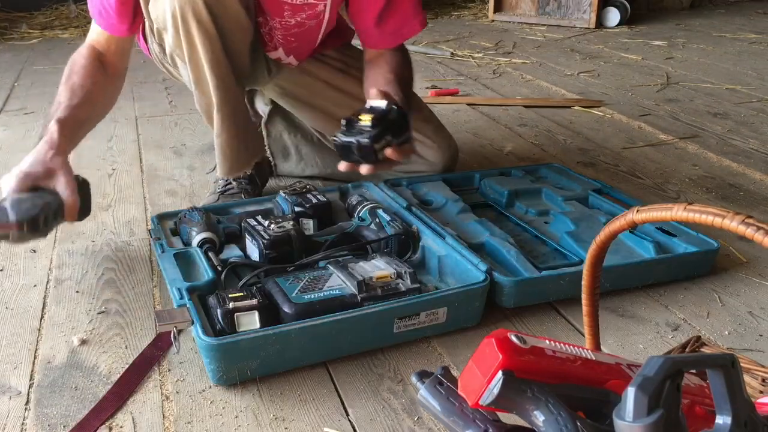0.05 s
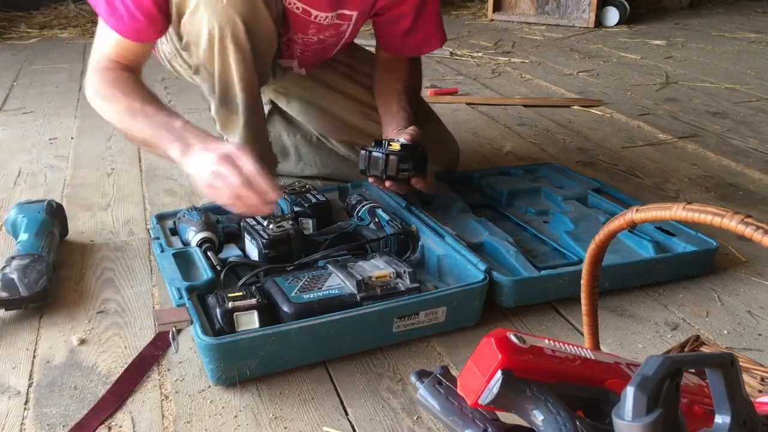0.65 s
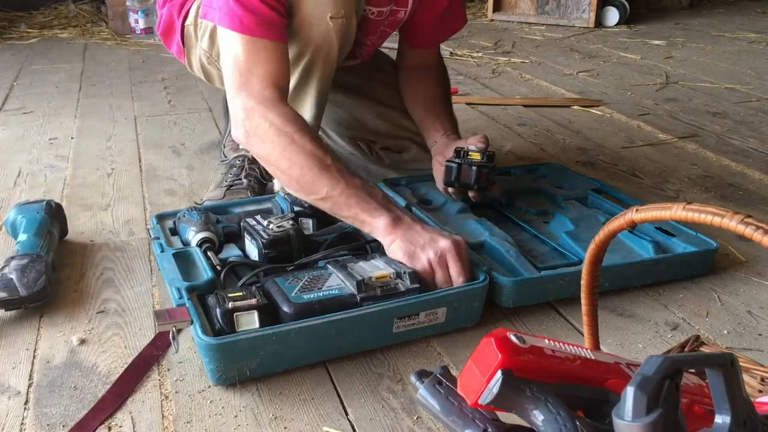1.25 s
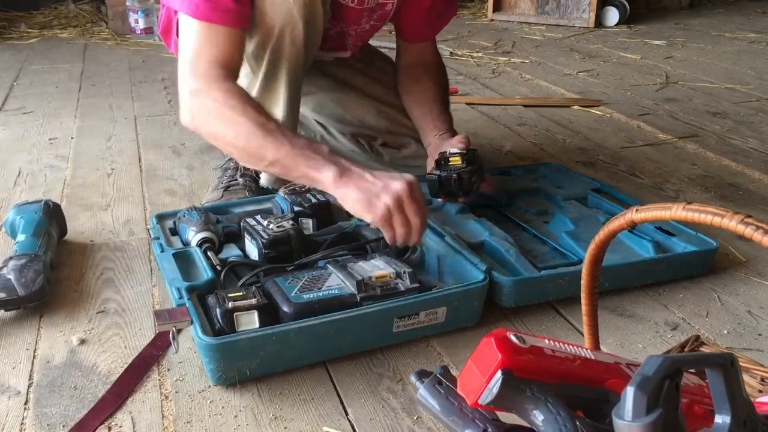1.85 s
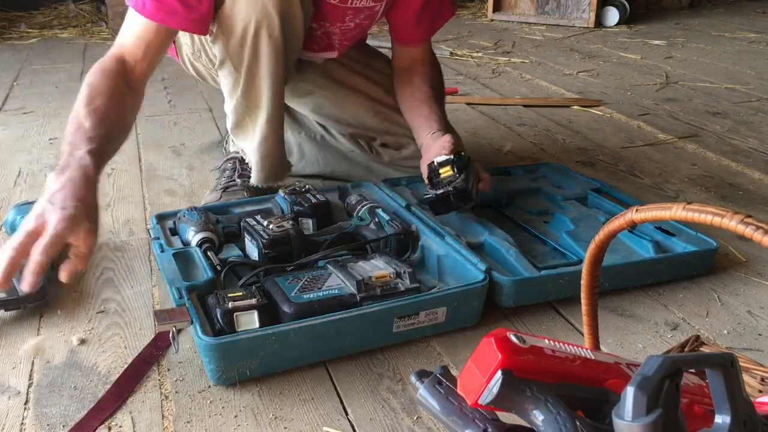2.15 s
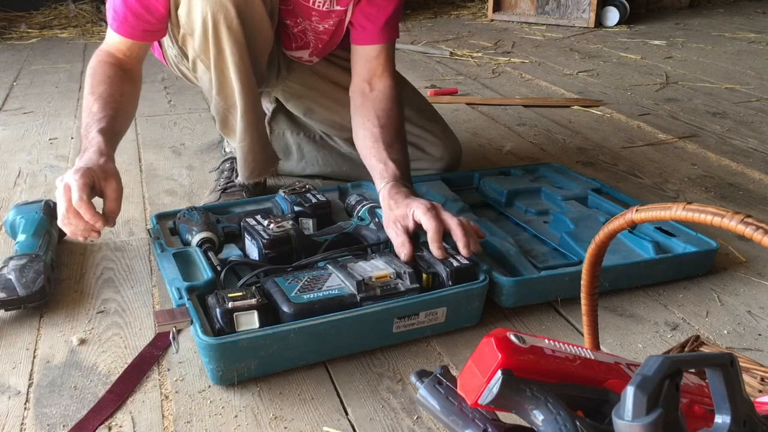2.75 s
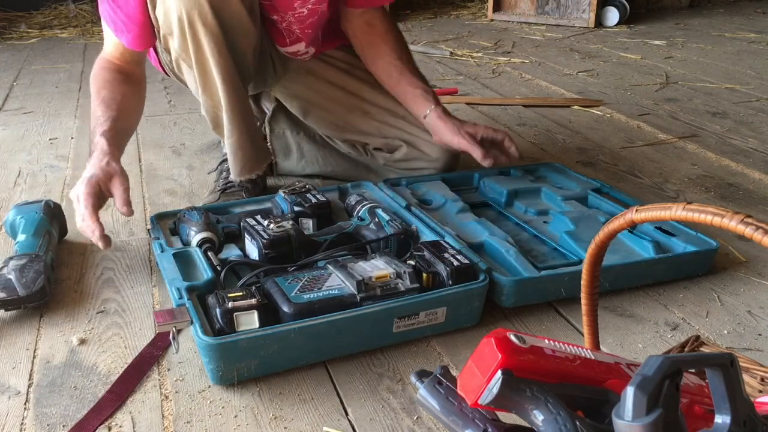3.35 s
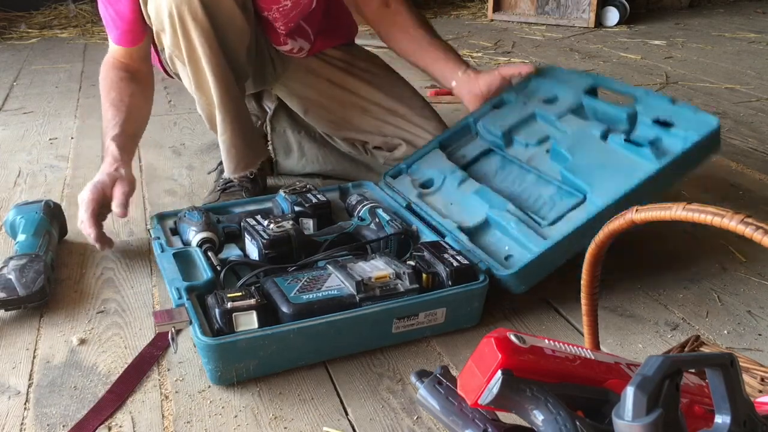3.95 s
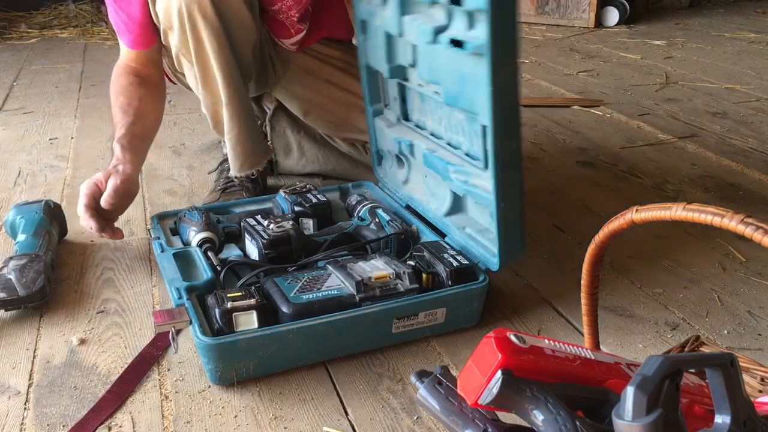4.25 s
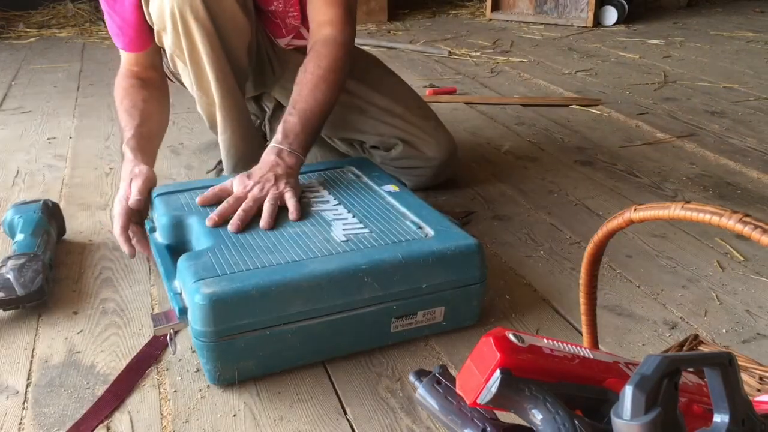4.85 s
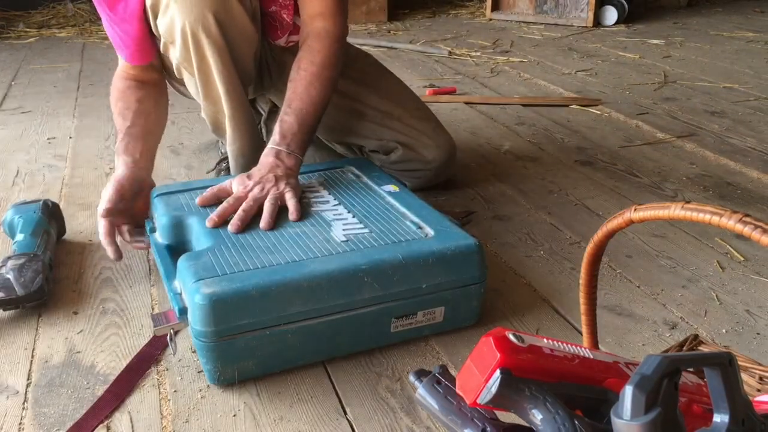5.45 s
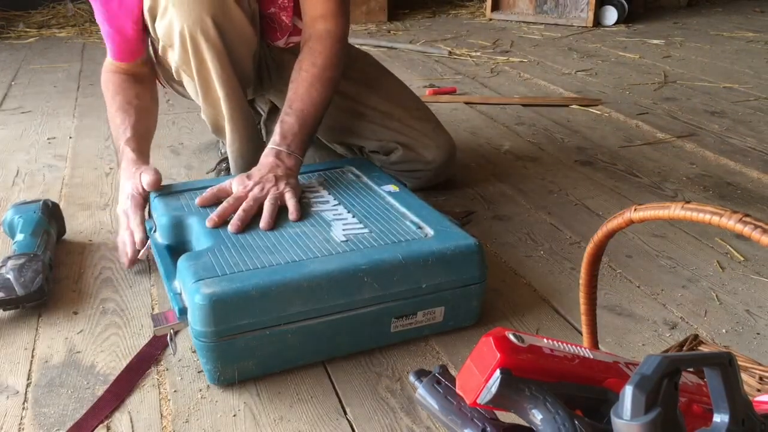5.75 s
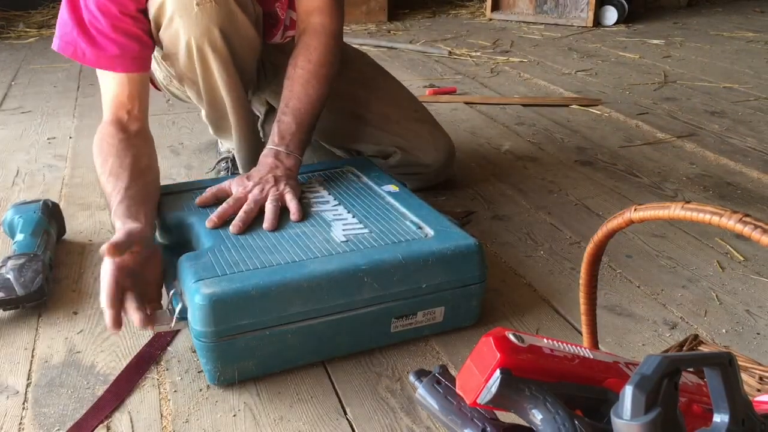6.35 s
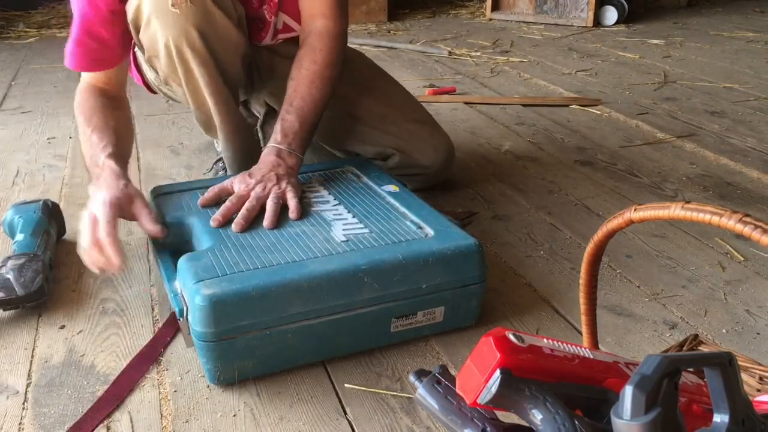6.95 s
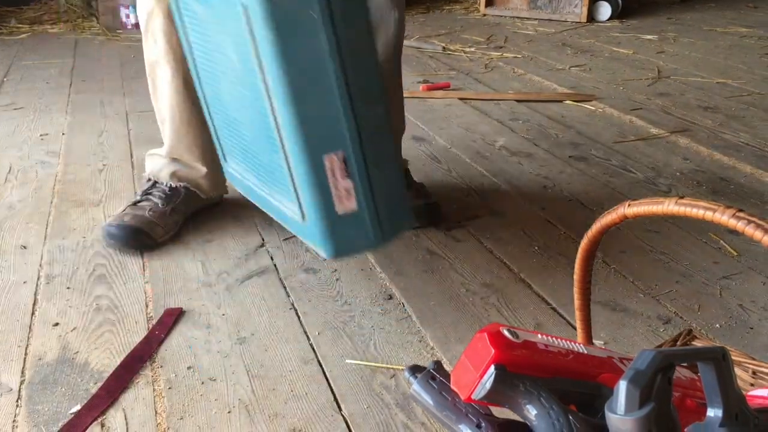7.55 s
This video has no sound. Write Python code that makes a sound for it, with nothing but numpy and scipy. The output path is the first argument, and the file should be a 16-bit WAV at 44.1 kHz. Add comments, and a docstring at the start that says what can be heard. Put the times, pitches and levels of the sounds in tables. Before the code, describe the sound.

Tools clunk onto floorboards and into a plastic case, then the lid slams, two metal latches click shut and the case scrapes away.

```python
"""Packing a tool case in a barn

A drill lands on booming floor planks and a battery is pressed into a hollow plastic case. The lid falls
shut, two steel latches jingle and snap closed, and the case is dragged up by its handle. In between,
sleeves swish, hands and tools scrape over the shell in tiny slips, and soft thumps land close by.
A far bird chirps faintly; the timber walls add a short reverb over a low rumble."""
import sys
import numpy as np
from scipy import signal
from scipy.fft import rfft, irfft, next_fast_len
from scipy.io import wavfile

SR = 44100
rng = np.random.default_rng(int(sys.argv[2]) if len(sys.argv) > 2 else 0)


def unload_wav(signal):
    """Save mono or channel-first audio to the path in sys.argv[1] as 16-bit WAV at rate SR, clipped to [-1, 1]."""
    wavfile.write(
        sys.argv[1],
        SR,
        np.round(np.clip(np.atleast_2d(signal).T, -1, 1) * 32767).astype(np.int16),
    )


N = 335601
TIME = np.arange(N) / SR
BLOW = int(.6 * SR)   # samples given to one hit and its tail

# hollow modes of the plastic shell: f/Hz, level/dB, t60/s
SHELL_MODES = [(360.6,6,0.057),(429,2.5,0.036),(500,-8,0.043),(593,-2.5,0.13),(638,3,0.025),(724,-0.5,0.042),(800,-5,0.02),(953,-1.5,0.09),(1124,2,0.0031),(1222,-2,0.033),(1358,-1,0.01),(1495,-11,0.056)]
# modes of the tools' hard housings: f/Hz, level/dB, t60/s
TOOL_MODES = [(1048, 7, 0.07), (1340, 1, 0.08), (1672, -2.5, 0.036), (2190, -6.5, 0.12), (2424, -3, 0.041),
              (2724, -5.5, 0.035), (3950, -3, 0.054)]
# modes of a steel latch loop, hanging "free" or "hooked" on its catch: f/Hz, level/dB, t60/s
LOOP_MODES = {"free": [(4680,2,0.1),(6960,-4,0.072),(8050,-4,0.076),(9400,-6,0.081),(13160,6,0.099),(14100,-14,0.11),(15020,0,0.14)],
              "hooked": [(3300,2,0.062),(4610,9,0.025),(6800,4,0.077),(13660,2,0.089),(14600,2,0.15),(15600,0,0.14)]}
# spectrum of a dry contact crack: f/Hz, level/dB
CRACK_COLOUR = [(900,-6),(1600,-4.5),(2400,-0.5),(2800,-3),(3600,-6.5),(5000,-9.5),(7000,-12)]
# spectrum of a bright contact tick: f/Hz, level/dB
TICK_COLOUR = [(3500,-28),(5000,-5),(7000,3),(8200,5),(9300,10.5),(11000,2.5),(13500,9.5),(16000,-5.5)]
# hands and tools sliding over the plastic: middle t/s, half length/s, level/dB
STROKES = [(1.005, 0.044, -42), (1.138, 0.016, -38), (1.239, 0.053, -46.5), (1.49, 0.05, -41),
           (1.756, 0.075, -37), (2.969, 0.17, -51), (3.658, 0.065, -42), (3.925, 0.066, -45.5),
           (4.24, 0.14, -51.5), (4.607, 0.0081, -31.5), (5.125, 0.058, -42), (7.18, 0.083, -45.5),
           (7.41, 0.14, -38.5)]


def amp(db):
    return 10 ** (np.asarray(db) / 20)


def rms_one(x):
    return x / np.sqrt(np.mean(x ** 2) + 1e-20)


def attack_one(x):
    """Unit rms over the first 25 ms."""
    return x / np.sqrt(np.mean(x[:SR // 40] ** 2) + 1e-20)


def add(out, s, x):
    """Mix x in at time s."""
    i = max(0, int(s * SR))
    out[i:i + len(x)] += x[:max(0, N - i)]


def at_hz(points, hz, column=1):
    """Read a column of a table on a log-frequency axis."""
    points = np.array(points)
    return np.interp(np.log(np.maximum(hz, 1)), np.log(points[:, 0]), points[:, column])


def band(x, low_hz, high_hz, order=2):
    """Butterworth band-pass."""
    sos = signal.butter(order, [low_hz, min(high_hz, .45 * SR)], "band", fs=SR, output="sos")
    return signal.sosfilt(sos, x)


def colour(x, points):
    """Minimum-phase EQ with the given spectrum, falling 12 dB an octave beyond its ends."""
    size = 2 * next_fast_len(len(x) // 2 + 2048)
    hz = np.maximum(np.fft.rfftfreq(size, 1 / SR), 1)
    octaves_beyond = np.abs(np.log2(hz / np.clip(hz, points[0][0], points[-1][0])))
    cepstrum = irfft(np.log(amp(at_hz(points, hz) - 12 * octaves_beyond)))
    cepstrum[1:size // 2] *= 2
    cepstrum[size // 2 + 1:] = 0
    return irfft(rfft(x, size) * np.exp(rfft(cepstrum)))[:len(x)]


def drift(per_s):
    """Random wander of unit rms."""
    knots = rng.standard_normal(4000)
    return rms_one(np.interp(TIME * per_s, np.arange(len(knots)), knots))


def swells(rows):
    """Gain of movements that speed up and slow down smoothly."""
    return sum(amp(db) * np.exp(-((TIME - s) / half_length_s) ** 2) for s, half_length_s, db in rows)


def ring(force, hz, t60):
    """One damped mode."""
    radius, angle = amp(-60 / (t60 * SR)), 2 * np.pi * hz / SR
    return signal.lfilter([.5, 0, -.5], [1, -2 * radius * np.cos(angle), radius ** 2], force + 1e-18)


def contacts(rattle_s, per_s, follow_db):
    """A first touch, then a dying chatter of loose parts."""
    t = np.arange(BLOW) / SR
    chatter = (rng.random(BLOW) < per_s / SR) * rng.standard_normal(BLOW)
    force = chatter * amp(follow_db) * np.exp(-t / max(rattle_s, 1e-4))
    force[0] = 1
    return force


def strike(force, modes, centre_hz, focus_db, scatter_db, detune):
    """Place and grip shift the modes and favour those near one pitch (focus_db: loss an octave off)."""
    out = 0
    for hz, db, t60 in modes:
        gain = amp(db - focus_db * np.log2(hz / centre_hz) ** 2 + scatter_db * rng.standard_normal())
        mode = ring(force, hz * (1 + detune * rng.standard_normal()), t60)
        out = out + rng.choice([-1, 1]) * gain * attack_one(mode)
    return out


def crackle(force, spectrum, decay_s):
    """Countless, heavily damped upper modes: each touch feeds them, and they die at once."""
    energy = signal.lfilter([1], [1, -np.exp(-2 / (decay_s * SR))], force ** 2 + 1e-18)
    return colour(np.sqrt(energy) * rng.standard_normal(len(force)), spectrum)


def background(rumble_gain_db, air_db, hiss_db):
    """A bed of lumpy rumble, quiet barn air and faint hiss."""
    # the rumble swells with the body's movements: t/s, level/dB
    rumble_ride = [(0.0, -60.5), (0.51, -37.5), (1.29, -50.5), (2.75, -43.5), (4.47, -51), (4.81, -44),
                   (5.79, -48.5), (6.45, -48.5), (6.59, -37.5), (6.78, -34), (7.18, -32.5), (7.61, -41)]
    # its spectrum: f/Hz, level/dB
    rumble_colour = [(22,-16),(45,7),(90,-1.5),(160,-9),(260,-21.5),(450,-33.5)]
    # spectrum of the air's hiss: f/Hz, level/dB
    hiss_colour = [(1180, -25.5), (2240, -8), (4400, -12), (6000, -8), (9000, -6.5), (10400, -14.5),
                   (12400, -5.5), (16000, -12)]
    swell_db = np.interp(TIME, *np.transpose(rumble_ride)) + 3.93 * drift(22)
    rumble = amp(rumble_gain_db + swell_db) * rms_one(colour(rng.standard_normal(N), rumble_colour))
    air = amp(air_db) * rms_one(band(rng.standard_normal(N), low_hz=757, high_hz=1165, order=1))
    hiss = amp(hiss_db) * rms_one(colour(rng.standard_normal(N), hiss_colour))
    return rumble + air + hiss


def tool_knocks():
    """Hard housings ring higher than the case, each touch with a small crack and a pitch of its own."""
    # tools are gripped, set down and shifted: t/s, level/dB, centre f/Hz
    knocks = [(0.04, -42, 1830), (0.313, -35.5, 1960), (0.508, -47, 2010), (1.14, -51, 1690),
              (1.451, -47, 1300), (1.479, -42, 1200), (1.496, -37.5, 2000), (1.728, -44, 1200),
              (1.756, -38.5, 1400), (3.618, -47, 1203), (7.388, -41.5, 1970), (7.441, -44, 2393)]
    out = np.zeros(N)
    for s, db, hz in knocks:
        force = contacts(rattle_s=0.0056, per_s=760, follow_db=-12.5)
        housing = strike(force, TOOL_MODES, hz, focus_db=9.5, scatter_db=1, detune=0.04)
        crack = crackle(force, CRACK_COLOUR, decay_s=0.002)
        add(out, s, amp(db) * (attack_one(housing) + amp(-12.5) * attack_one(crack)))
    return out


def thumps(width_cycles, nudges_per_s, nudge_db, nudge_hz):
    """Soft pressure swings of a cycle or two, too close to excite the room; weak nudges fall at random."""
    # the strong thumps: t/s, level/dB, f/Hz
    strong = [(1.022, -25, 113), (1.326, -19, 73), (1.709, -16, 56), (1.883, -16.5, 84), (2.447, -25, 171),
              (2.546, -23.5, 116), (3.38, -23, 106.8), (3.416, -23, 170), (3.498, -27, 84),
              (4.626, -2.5, 114.5), (4.99, -21, 100.9), (6.619, -23.5, 230), (6.705, -13, 138),
              (6.79, -10.5, 110), (6.909, -11, 117), (7.121, -19.5, 126), (7.361, -15, 95)]
    out, t = np.zeros(N), np.arange(-SR // 10, SR // 10) / SR
    nudges = [((k + late) / nudges_per_s, nudge_db - softer, nudge_hz * 2 ** (0.18 * higher))
              for k, (late, softer, higher) in enumerate(rng.standard_normal(size=(40, 3)))]
    for s, db, hz in strong + nudges:
        phase = 2 * np.pi * (hz * t + rng.random())
        push = 1 / np.cosh(hz * t / width_cycles)
        swing = np.sin(phase) + 0.5 * push ** 2 * np.sin(2 * phase)   # steepens at its crest
        add(out, s + t[0], amp(db) * push * swing)
    return out


def rubbing(gain_db):
    """Each stroke is a swell of tiny slips that excite the shell, with cloth and skin hissing above."""
    # sleeves and trousers swish: middle t/s, half length/s, level/dB
    swishes = [(0.173, 0.055, -57.5), (2.128, 0.0099, -65), (3.138, 0.038, -55), (3.288, 0.0044, -75),
               (6.325, 0.046, -44), (6.902, 0.092, -57.5)]
    # spectrum of rubbed plastic: f/Hz, level/dB
    rub_colour = [(150,6.5),(280,8.5),(450,0.5),(700,1),(1100,1.5),(1500,-8),(2200,-14),(4000,-16.5),(7000,-22.5)]
    # spectrum of cloth and skin hiss: f/Hz, level/dB
    hiss_colour = [(2000,-16),(4000,5),(6000,-3),(8500,0.5),(11000,-0.5),(15500,-4),(17000,-5)]
    sliding, swishing = swells(STROKES), swells(swishes)
    shell_gain = sliding + amp(-2.5) * swishing   # cloth has a low rustle too
    hiss_gain = swishing + amp(-20.5) * sliding   # skin hisses a little
    slips = (rng.random(N) < 900 / SR) * rng.standard_normal(N)
    slips = rms_one(slips * amp(7 * np.tanh(drift(70))))
    scrape = rms_one(colour(rng.standard_normal(N) + slips, rub_colour))
    hollow = rms_one(sum(amp(db) * ring(slips, hz, t60) for hz, db, t60 in SHELL_MODES))
    shell = shell_gain * rms_one(scrape + 0.36 * hollow)
    hiss = hiss_gain * rms_one(colour(rng.standard_normal(N) + 0.94 * slips, hiss_colour))
    return amp(gain_db) * (shell + hiss)


def boom(force, db, centre_hz, lowest_hz):
    """The boards and the air in the case answer a heavy blow."""
    # modes of the floor boards and the enclosed air: f/Hz, level/dB, t60/s
    boom_modes = [(53.5,6,0.28),(65,9,0.39),(89.6,-3,0.23),(124.5,1,0.28),(158,7,0.18),(181,-1,0.4),(215.3,8.5,0.14),(276,7.5,0.068),(327.4,-0.5,0.26)]
    low = strike(force, boom_modes, centre_hz, focus_db=5.0, scatter_db=2.0, detune=0.014)
    return amp(db - 2.5) * attack_one(band(low, low_hz=lowest_hz, high_hz=405))


def plastic(force, shell_db, shell_hz, crack_db, tick_db):
    """The shell rings hollow under a crack and a bright contact tick, each with its own level trim."""
    shell = strike(force, SHELL_MODES, shell_hz, focus_db=9.0, scatter_db=4.5, detune=0.02)
    shell = attack_one(band(shell, low_hz=294, high_hz=1750, order=3))
    crack = attack_one(crackle(force, CRACK_COLOUR, decay_s=0.0051))
    tick = attack_one(crackle(force, TICK_COLOUR, decay_s=0.0019))
    return amp(shell_db - 0.01) * shell + amp(crack_db + 1.73) * crack + amp(tick_db - 6.5) * tick


def landings():
    """Heavy blows boom and ring the shell, each body in its own way; the lid rattles on."""
    # blows on floor and case: t/s, level/dB, body
    blows = [(0.3124, -10, "drill"), (0.3202, -12.5, "drill"), (0.3902, -16.5, "drill"),
             (2.6092, -15, "battery"), (2.6631, -12, "battery"), (2.6724, -10, "battery"),
             (2.684, -13, "contents"), (2.7105, -19, "contents"), (4.6136, -10.5, "lid"),
             (4.6242, -22.5, "contents"), (4.7681, -30.5, "contents"), (4.998, -29.5, "press"),
             (5.6978, -30, "press"), (6.876, -19, "knee"), (7.311, -26, "contents")]
    # each body's voice, with levels relative to the blow:
    # boom f/Hz, shell f/Hz, shell level/dB, crack level/dB, tick level/dB, rattle/s (negative: none)
    bodies = {"drill": (134, 589, -17.5, -30, -30, -0.1616), "battery": (231, 714, -3.5, -19.5, -31, -0.15),
              "lid": (127, 778, -6.5, -21, -20, 0.0518), "press": (100, 720, -4, -25, -26, 0.004),
              "contents": (169, 745, -7.5, -18.5, -12, -0.0765), "knee": (189, 482, -11.5, -45, -45, -0.14)}
    out = np.zeros(N)
    for s, db, body in blows:
        boom_hz, shell_hz, shell_db, crack_db, tick_db, rattle_s = bodies[body]
        force = contacts(rattle_s, per_s=1200, follow_db=-2.0)
        add(out, s, boom(force, db, boom_hz, lowest_hz=33))
        add(out, s, plastic(force, db + shell_db, shell_hz, db + crack_db, db + tick_db))
    return out


def ping(s, hz, db, t60):
    """A small steel part on the drill rings once as it settles."""
    out, t = np.zeros(N), np.arange(BLOW) / SR
    add(out, s, amp(db) * np.sin(2 * np.pi * hz * t) * amp(-60 * t / t60))
    return out


def bird(start_hz, end_hz, length_s, detune, twitter_from_s, twitter_per_s, twitter_db):
    """Thin, rough downward chirps, with a run of quicker and fainter notes between them."""
    # the far bird's main chirps: t/s, level/dB
    chirps = [(0.873,-58),(3.26,-56),(3.454,-61),(3.99,-64),(4.205,-59)]
    out, progress = np.zeros(N), np.linspace(0, 1, int(length_s * SR))
    twitter = [(twitter_from_s + (k + late) / twitter_per_s, twitter_db)
               for k, late in enumerate(rng.random(size=20))]
    for s, db in chirps + twitter:
        hz = (start_hz + (end_hz - start_hz) * progress) * (1 + detune * rng.standard_normal())
        add(out, s, amp(db) * np.sin(np.pi * progress) * np.sin(2 * np.pi * np.cumsum(hz) / SR))
    roughness = rms_one(amp(3 * drift(560)))
    return out * roughness


def scraping(gain_db, per_s, rattle_s):
    """A tool slides in short jerks; each one sings in the housing at slightly different pitches."""
    out, sliding = np.zeros(N), swells(STROKES)
    for k, late in enumerate(rng.random(size=240)):
        s = (k + late) / per_s
        pressure = np.interp(s, TIME, sliding)
        if pressure > amp(-55):
            force = contacts(rattle_s, per_s=1500, follow_db=-12)
            jerk = strike(force, TOOL_MODES, centre_hz=1450, focus_db=6.5, scatter_db=11.5, detune=0.0746)
            add(out, s, amp(gain_db) * pressure * attack_one(jerk))
    return out


def grit(per_s, gain_db, spread_db):
    """While things slide, edges catch and let go in small dry cracks."""
    catches = (rng.random(N) < per_s / SR) * amp(spread_db * rng.random(N))
    cracks = rms_one(crackle(catches, CRACK_COLOUR, decay_s=0.0052))
    return amp(gain_db) * swells(STROKES) * cracks


def taps():
    """Light touches sound the plastic alone, with no boom."""
    # taps of fingers and handle: t/s, shell level/dB
    touches = [(1.495, -34), (3.5725, -31.5), (3.6075, -27.5), (5.0698, -29.5), (5.393, -44.5),
               (7.245, -32)]
    out = np.zeros(N)
    for s, db in touches:
        force = contacts(rattle_s=0.003, per_s=1500, follow_db=0)
        add(out, s, plastic(force, db, shell_hz=850, crack_db=db - 16.5, tick_db=db - 22))
    return out


def wire_loop(modes, db, centre_hz, rattle_s, hasp_db):
    """A latch loop chatters in its hinge and rings; its hasp jangles with new partials at every seating."""
    force = contacts(rattle_s, per_s=550, follow_db=-10)
    loop = strike(force, modes, centre_hz, focus_db=4.0, scatter_db=2, detune=0.0008)
    partials = [(hz, 0, 0.031) for hz in rng.uniform(2828, 14020, size=30)]   # f/Hz, level/dB, t60/s
    hasp = strike(force, partials, centre_hz, focus_db=3, scatter_db=10.5, detune=0)
    steel = attack_one(loop) + amp(hasp_db) * attack_one(hasp)
    return amp(db - 5.0) * attack_one(band(steel, low_hz=2680, high_hz=19200))


def jingles():
    """The dangling loops tick against the rim, too lightly to ring the shell."""
    # loops jump after hard blows and under the fingers: t/s, level/dB, centre f/Hz
    jumps = [(2.623, -28, 8000), (2.669, -27.5, 5500), (2.691, -26.5, 9600), (2.711, -29, 4740),
             (3.7177, -48, 8400), (4.62, -21.5, 15000), (4.653, -28, 4020), (4.686, -40, 7000),
             (4.984, -43.5, 8500), (5.135, -52, 8000), (5.249, -49.5, 9300), (5.534, -36.5, 11500),
             (6.137, -48, 15000)]
    out = np.zeros(N)
    for s, db, hz in jumps:
        force = contacts(rattle_s=0.004, per_s=1260, follow_db=-8)
        tick = crackle(force, TICK_COLOUR, decay_s=0.0018)
        steel = wire_loop(LOOP_MODES["free"], db, hz, rattle_s=0.014, hasp_db=-5)
        add(out, s, amp(db - 21.5) * attack_one(tick) + steel)
    return out


def squeaks(half_length_s, sag_per_s, roughness):
    """Brief stick-slip tones that sag as the pressure eases."""
    # skin and steel squeak as they slide: middle t/s, f/Hz, level/dB
    slides = [(3.105, 2100, -44), (6.349, 10100, -32.5)]
    out, t = np.zeros(N), np.arange(-SR // 20, SR // 20) / SR
    envelope = np.exp(-(t / half_length_s) ** 2)
    for s, hz, db in slides:
        pitch = hz * (1 - sag_per_s * t + roughness * drift(630)[:len(t)])
        add(out, s + t[0], amp(db) * envelope * np.sin(2 * np.pi * np.cumsum(pitch) / SR))
    return out


def latches(full_snap_db):
    """A light touch is mostly tick and steel ring; a full snap cracks, booms and rattles the whole case."""
    # the latches are swung up, hooked and snapped shut:
    # t/s, shell level/dB, shell f/Hz, steel level/dB, steel f/Hz, loop "free" or "hooked"
    moves = [(4.9215, -38, 865, -48, 9060, "free"), (5.4884, -34.5, 820, -31.5, 11400, "free"),
             (5.5117, -36, 860, -33, 12000, "free"), (5.585, -19.5, 920, -29, 12000, "hooked"),
             (5.8153, -18, 1170, -48, 8000, "hooked"), (5.8774, -12.5, 1010, -52, 8000, "hooked"),
             (6.3002, -34.5, 850, -31, 8000, "free"), (6.3616, -34.5, 835, -34, 6000, "hooked"),
             (6.4236, -18.5, 774, -28.5, 8500, "hooked"), (6.494, -24, 690, -28, 10300, "hooked"),
             (6.6018, -43, 870, -29.5, 8000, "hooked"), (6.6107, -25, 815, -31.5, 7000, "hooked"),
             (6.7259, -11.5, 1170, -32, 7000, "hooked")]
    out = np.zeros(N)
    for s, db, shell_hz, steel_db, steel_hz, loop in moves:
        effort_db = db - full_snap_db   # lighter snaps lose boom and rattle quickly, crack slowly
        force = contacts(rattle_s=0.0086 * amp(2.6 * effort_db) + 0.001, per_s=1200, follow_db=-3.0)
        tick_db = min(db + 3, -27)   # the steel's own tick soon reaches its limit
        shell = plastic(force, db, shell_hz, crack_db=-26.5 + 0.81 * effort_db, tick_db=tick_db)
        steel = wire_loop(LOOP_MODES[loop], steel_db, steel_hz, rattle_s=0.011, hasp_db=-3.5)
        low = boom(force, db=-16 + 2.64 * effort_db, centre_hz=306, lowest_hz=218)
        add(out, s, shell + steel + low)
    return out


def dip(s, half_length_s, depth_db):
    """The level dips briefly."""
    return amp(depth_db * np.exp(-((TIME - s) / half_length_s) ** 2))


def barn(x, predelay_s, scattered):
    """Timber walls give a fixed response; rafters and clutter scatter a share into a smooth wash."""
    # the barn's reverb: f/Hz, level/dB, t60/s
    reverb = [(61.3,-33,0.31),(253,-4.5,0.47),(674,-5,0.43),(1260,-3,0.42),(2320,-5.5,0.32),(4950,-5.5,0.28),(13200,-10,0.2)]
    t, response, wash = np.arange(BLOW) / SR, 0, 0
    white = rng.standard_normal((2, N))
    edges_hz = np.geomspace(40, 18000, 18)
    for k, (low, high) in enumerate(zip(edges_hz, edges_hz[1:])):
        hz = np.sqrt(low * high)
        decay_rate = np.log(1000) / at_hz(reverb, hz, column=2)
        noise = amp(at_hz(reverb, hz)) * rms_one(band(white[k % 2], low, high, order=4))
        tail = noise[-BLOW:] * np.exp(-decay_rate * t)
        response = response + tail * 2 * np.sqrt(decay_rate * (high - low)) / SR
        # the room stores each band's energy and lets it leak away
        power = band(x + 1e-12 * white[0], low, high, order=4) ** 2
        retained = np.exp(-2 * decay_rate / SR)
        energy = signal.lfilter([1 - retained], [1, -retained], power)
        wash = wash + np.sqrt(energy) * noise
    reflections = signal.fftconvolve(x, response)[:N]
    out = np.zeros(N)
    add(out, predelay_s, np.sqrt(1 - scattered) * reflections + np.sqrt(scattered) * wash)
    return out


def scene():
    """Handling and bird feed the barn's reverb; the background and the thumps stay dry."""
    sounds = landings() + taps() + tool_knocks() + latches(full_snap_db=-11.5) + jingles()
    sounds += ping(s=0.553, hz=7000, db=-63, t60=0.77)
    sounds += rubbing(gain_db=1.0)
    sounds += scraping(gain_db=-12.5, per_s=34, rattle_s=0.0097)
    sounds += grit(per_s=74, gain_db=-24, spread_db=25)
    sounds += squeaks(half_length_s=0.009, sag_per_s=1.3, roughness=0.024)
    sounds += bird(start_hz=9100, end_hz=7770, length_s=0.027, detune=0.023,
                   twitter_from_s=1.4, twitter_per_s=11, twitter_db=-66)
    mix = sounds + barn(sounds, predelay_s=.005, scattered=0.51)
    mix += background(rumble_gain_db=3.0, air_db=-61.5, hiss_db=-70.5)
    mix += thumps(width_cycles=0.45, nudges_per_s=3, nudge_db=-29.5, nudge_hz=91.5)
    return (mix * dip(s=7.043, half_length_s=0.011, depth_db=-22))[None]


def record(dry, cutoff_hz=16100):
    """A soft clip rounds the loudest peaks and a steep low-pass cuts the top."""
    rounded = dry / (1 + dry ** 6) ** (1 / 6)
    return signal.sosfilt(signal.ellip(10, .1, 90, cutoff_hz, fs=SR, output="sos"), rounded)


dry = scene()
out = record(dry)
unload_wav(out)
```